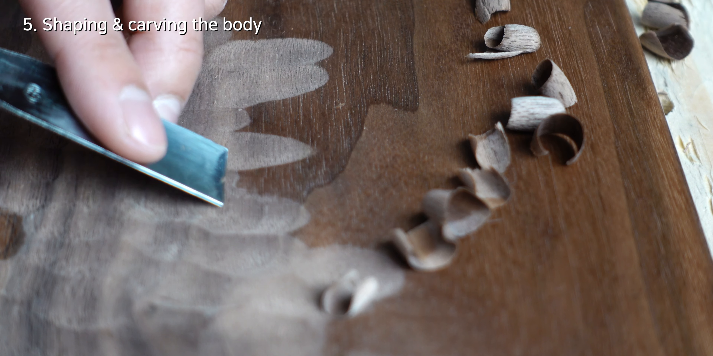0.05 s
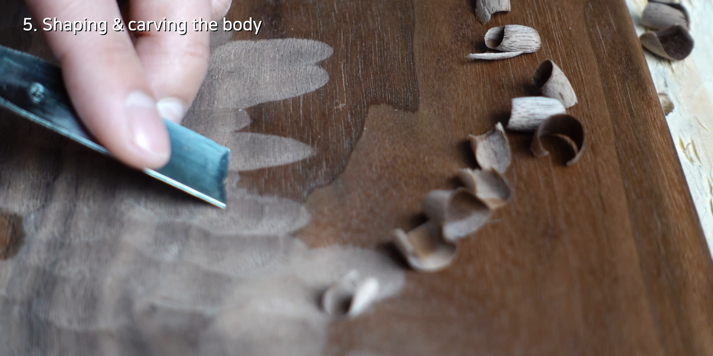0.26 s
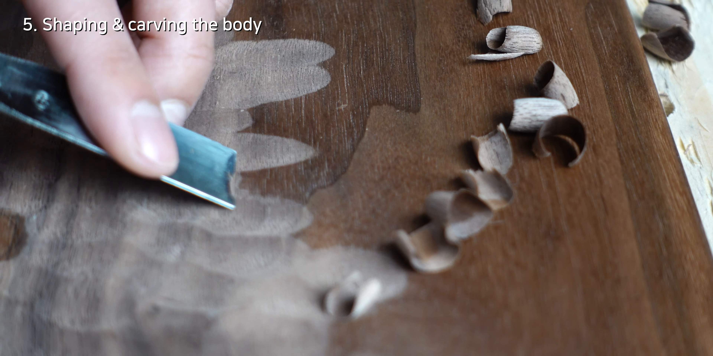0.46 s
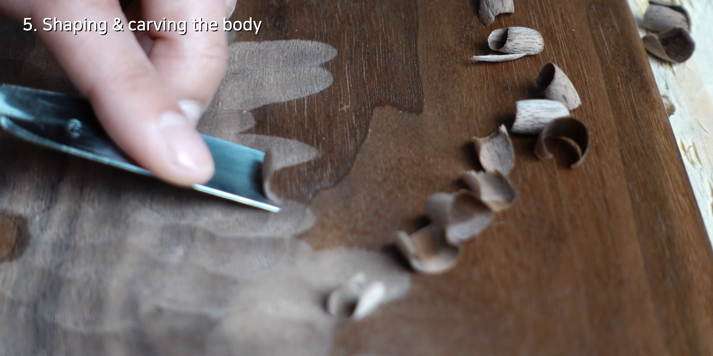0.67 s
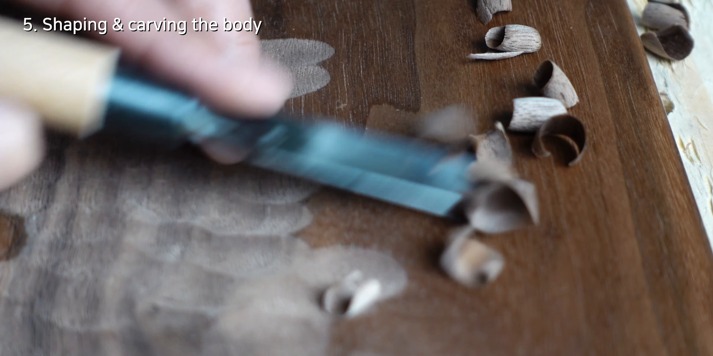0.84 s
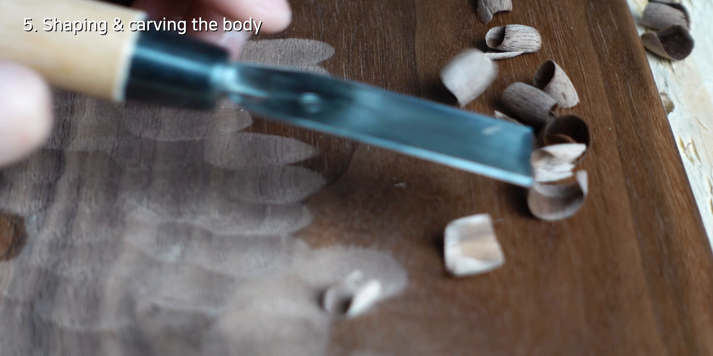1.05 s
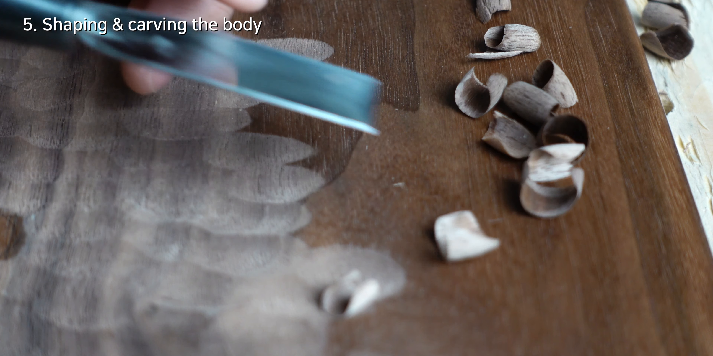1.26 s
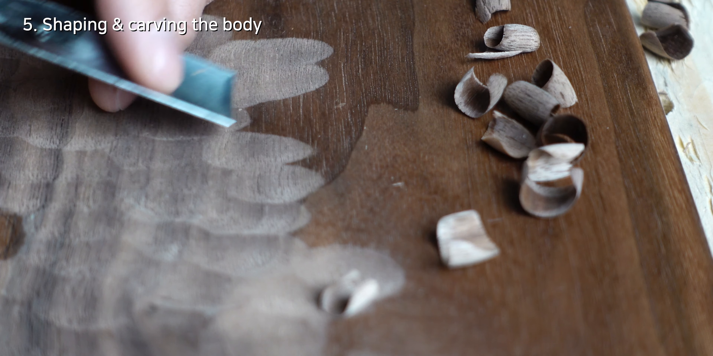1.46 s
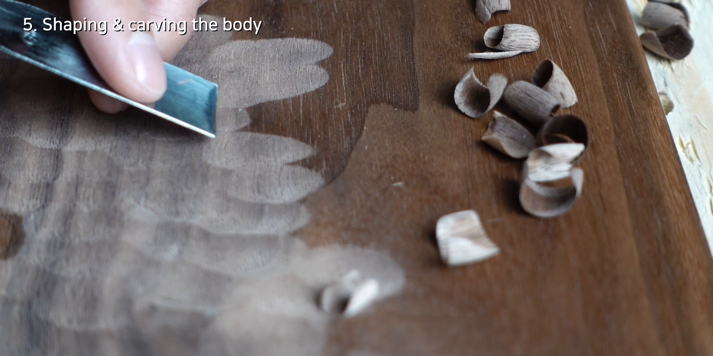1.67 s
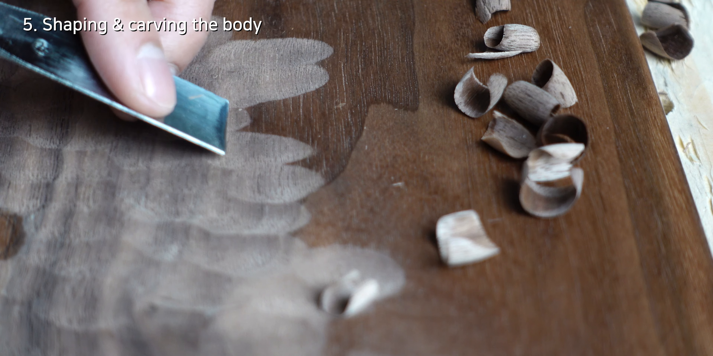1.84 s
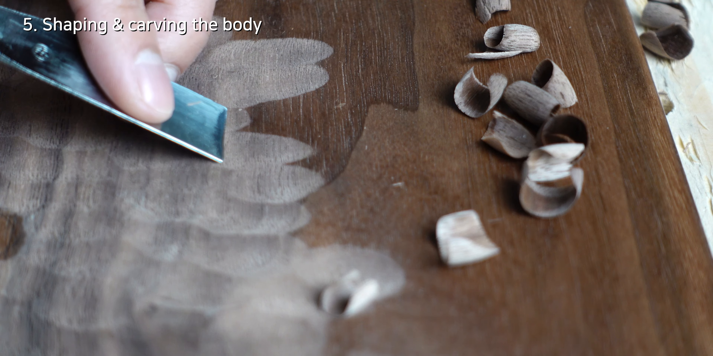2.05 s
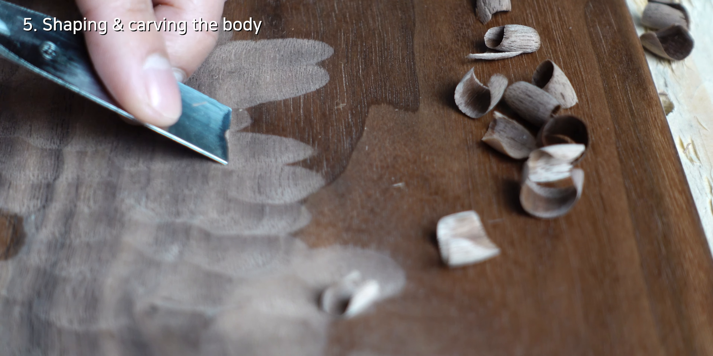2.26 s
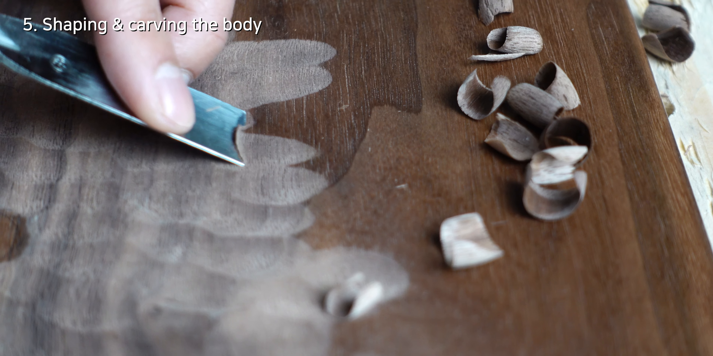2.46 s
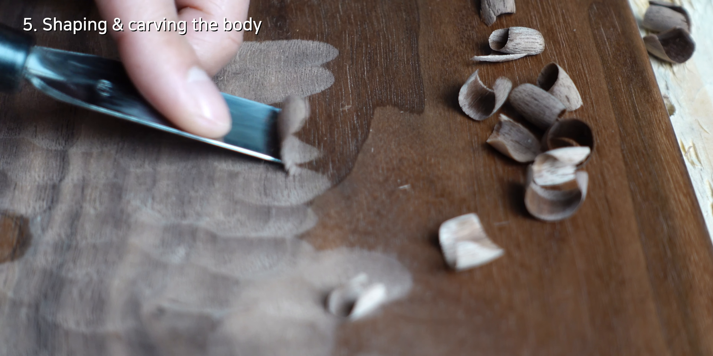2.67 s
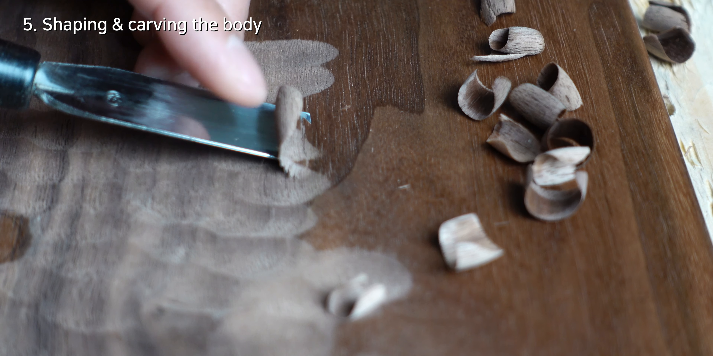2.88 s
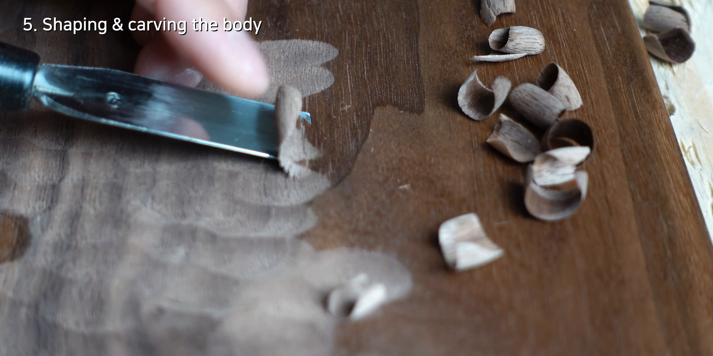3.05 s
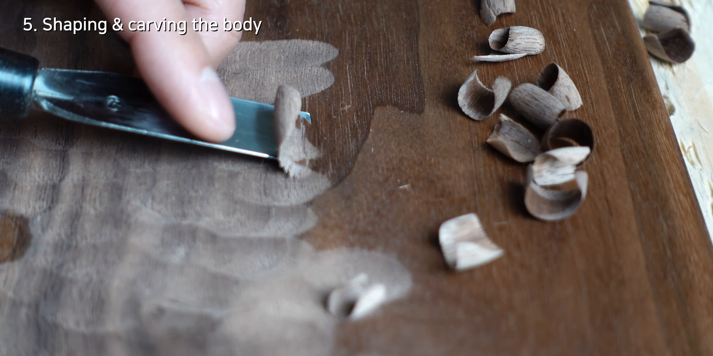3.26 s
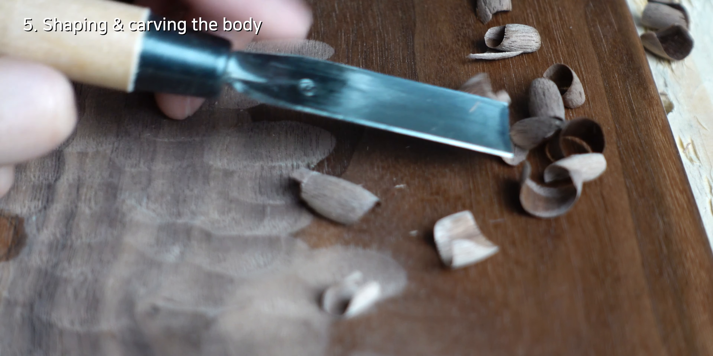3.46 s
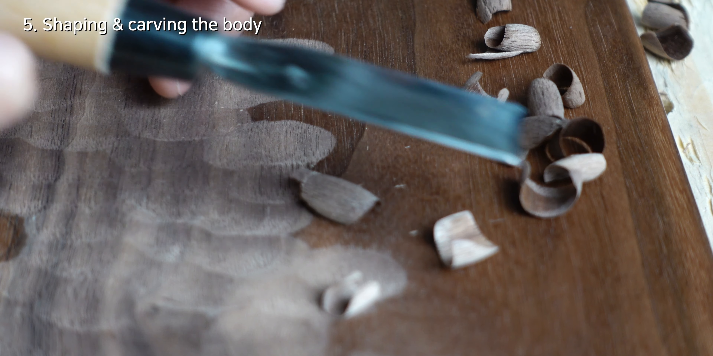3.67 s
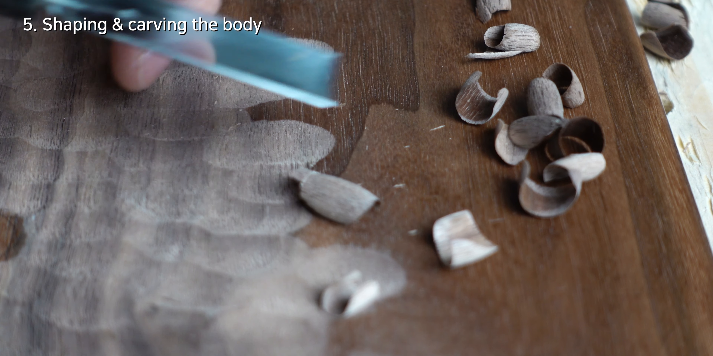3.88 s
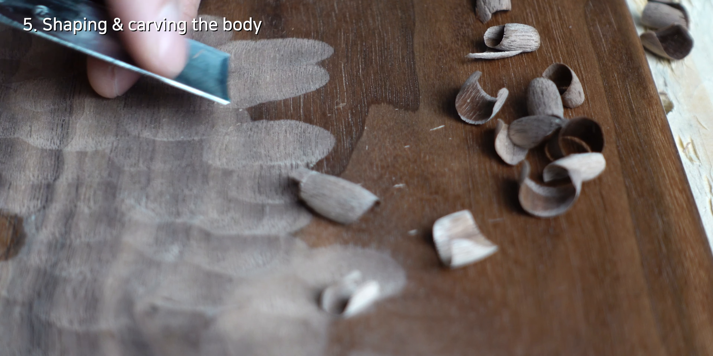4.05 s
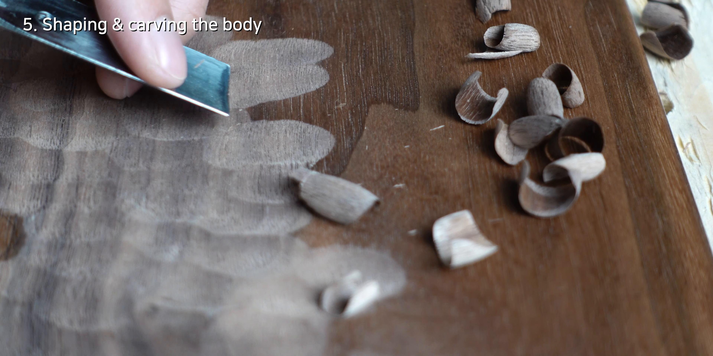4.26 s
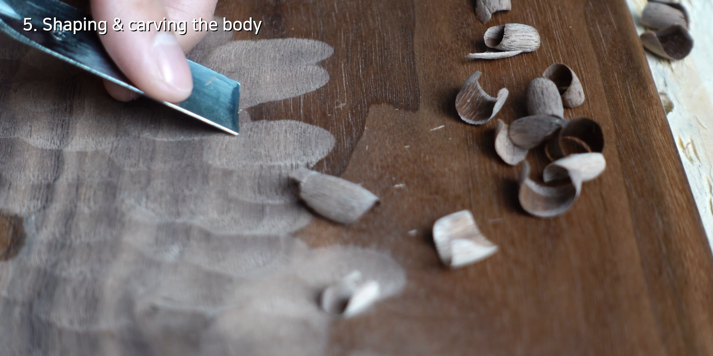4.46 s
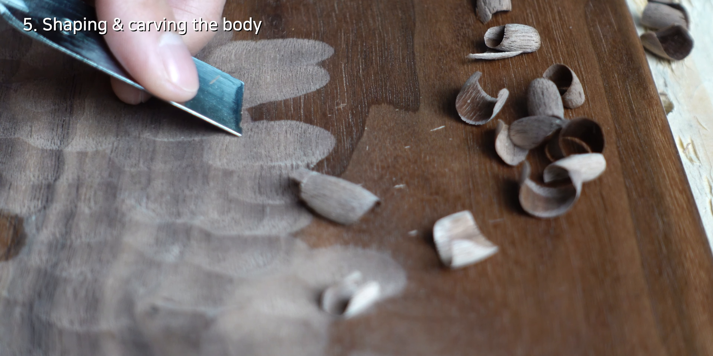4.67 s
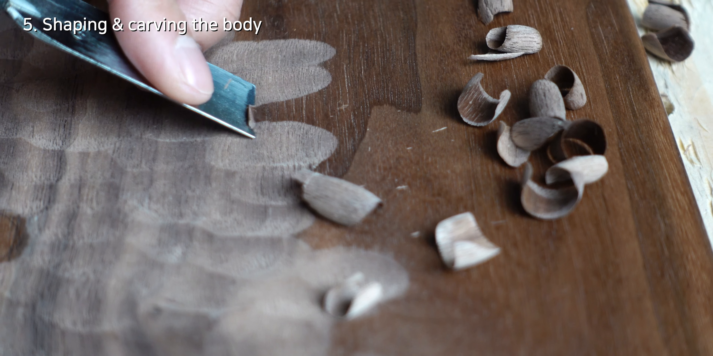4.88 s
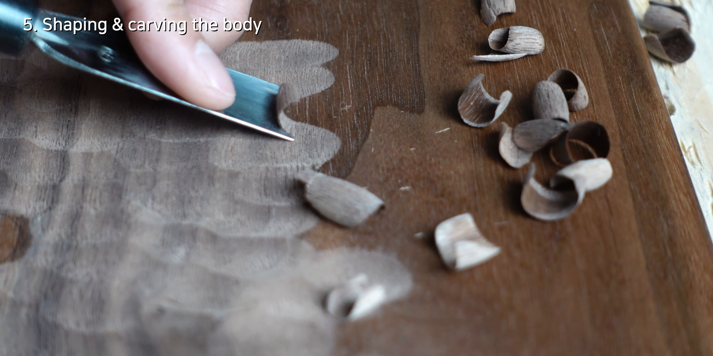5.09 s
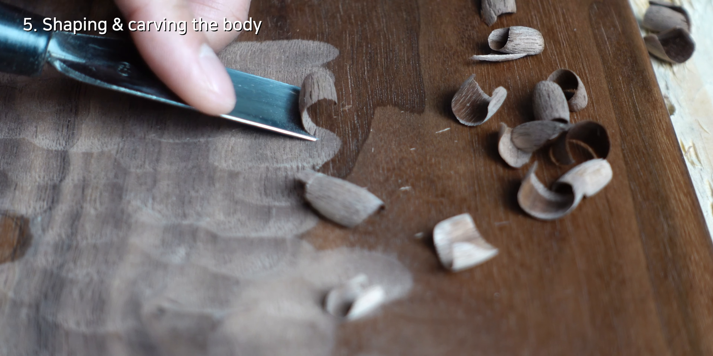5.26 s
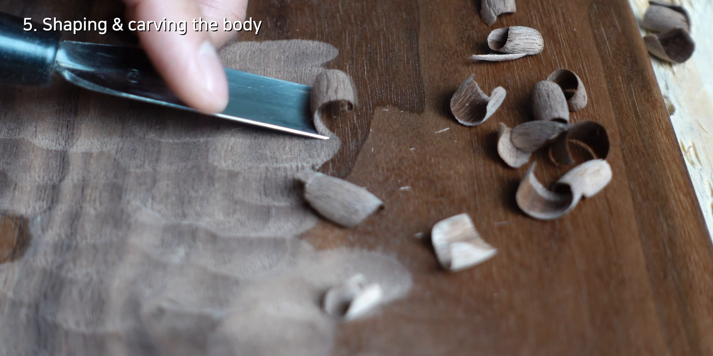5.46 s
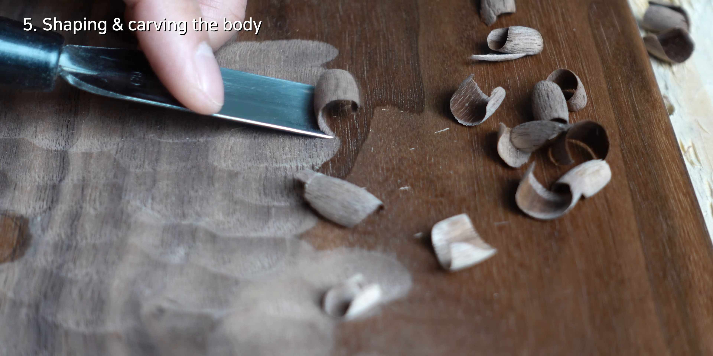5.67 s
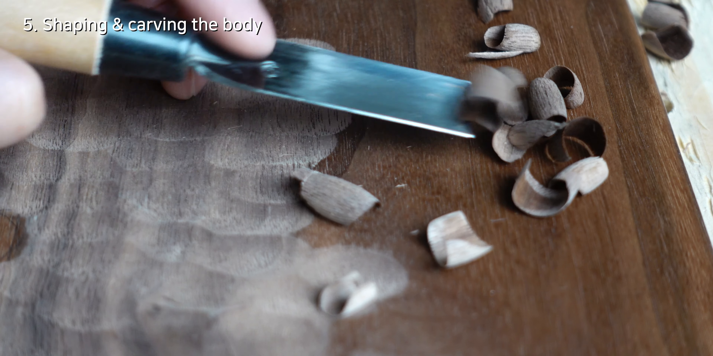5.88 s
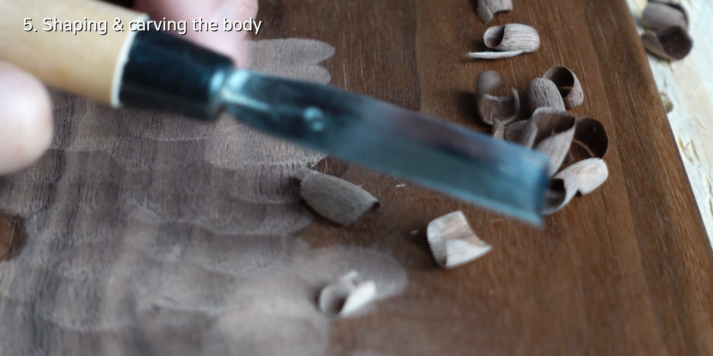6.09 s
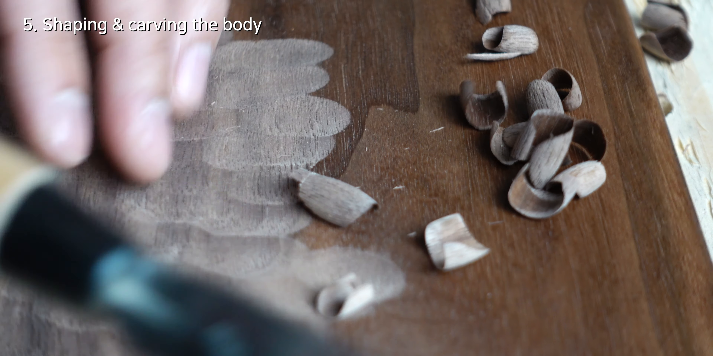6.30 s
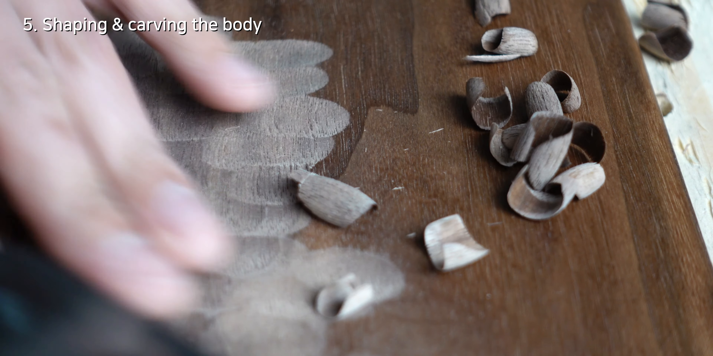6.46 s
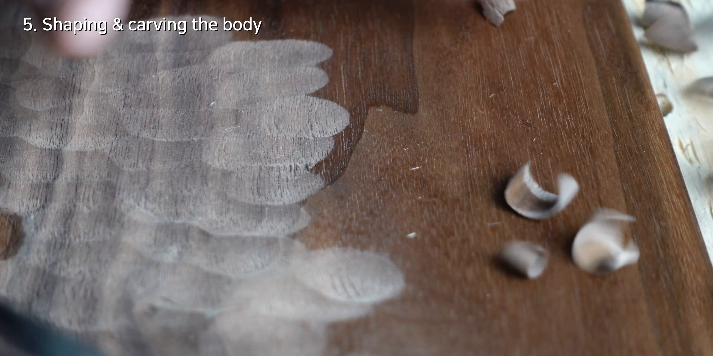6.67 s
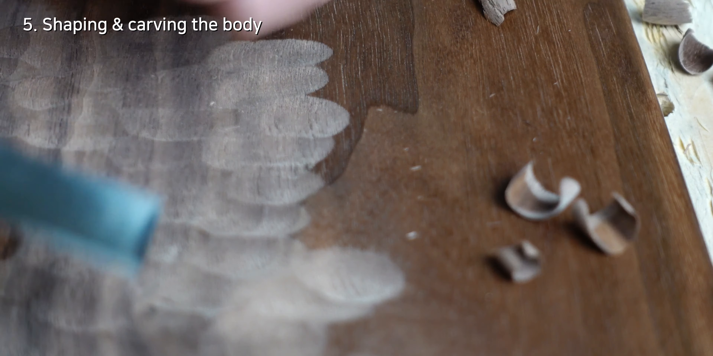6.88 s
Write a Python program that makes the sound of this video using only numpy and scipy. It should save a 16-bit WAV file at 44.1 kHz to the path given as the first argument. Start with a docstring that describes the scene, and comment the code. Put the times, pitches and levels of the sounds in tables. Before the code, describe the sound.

Heard very close in a quiet workshop, a hand gouge cuts a damp board in three strokes. Each builds from light ticks into dense, irregular crunching with small woody thuds, then the edge scrapes free with a brief mid-pitched squeak. Sleeves rustle softly between strokes, with faint knocks. At the end a hand brushes the board twice and curled shavings tick away.

```python
"""A hand gouge scoops shavings from a damp board, heard close by in a quiet workshop.
The edge moves by stick-slip: each slip tears fibres in a short crackle that excites modes of blade and board.
Fine shearing fills the pushes, and the freed edge scrapes out of the cut as gliding narrow-band noise and sings.
Knocks, scuffs and faint ticks, some dull and some bright, are bursts through the same modes. Shaped noise makes
the rustle of sleeves, a hand sweeping ticking shavings at the end, and the still air; decaying bands the room."""
import sys
import numpy as np
from scipy import signal
from scipy.fft import rfft, irfft, next_fast_len
from scipy.io import wavfile
from scipy.ndimage import uniform_filter1d

SR = 44100
rng = np.random.default_rng(int(sys.argv[2]) if len(sys.argv) > 2 else 0)


def dump(signal):
    """Clip the signal to [-1, 1] and save it as 16-bit WAV at the path in sys.argv[1]."""
    limited = np.clip(np.atleast_2d(signal).T, -1, 1)
    pcm = np.round(limited * 32767).astype(np.int16)
    wavfile.write(sys.argv[1], SR, pcm)


N = 305608
TIME = np.arange(N) / SR  # s


def undb(db):
    """Level: decibels to an amplitude ratio."""
    return 10 ** (np.asarray(db) / 20)


def unit(x):
    """Normalisation: scales a signal to an RMS of 1."""
    return x / np.sqrt(np.mean(x ** 2))


def filtered(x, hz, kind="low", order=2):
    """Linear filtering: a Butterworth low, high or band pass."""
    return signal.sosfilt(signal.butter(order, hz, kind, fs=SR, output="sos"), x)


def walk(rate):
    """Slow modulation: random levels of unit RMS, 'rate' per second, joined by straight slopes."""
    k = int(SR / rate)
    held = np.repeat(rng.standard_normal(N // k + 1), k)
    return unit(uniform_filter1d(held, k))[:N]


def pair(alike):
    """Interaural correlation: left and right noise with the given likeness, -1 to 1."""
    mid, side = rng.standard_normal((2, N))
    alike = np.clip(alike, -1, 1)
    opposed = side * np.array([[1], [-1]])
    return (np.sqrt(1 + alike) * mid + np.sqrt(1 - alike) * opposed) / np.sqrt(2)


def spread(x, envelope, side_db):
    """Source width: a wide source reaches both ports alike but for an opposed share of unrelated noise."""
    return envelope * (x + undb(side_db) * rng.standard_normal(N) * np.array([[1], [-1]]))


def crackle(spread_db):
    """Impulsive noise: sample sizes scatter widely, as of fibres snapping."""
    return unit(rng.standard_normal(N) * undb(spread_db * rng.exponential(1, N)))


def colour(x, points):
    """Spectral shaping: gain interpolated over log frequency between the given points."""
    hz, db = np.transpose(points)
    size = next_fast_len(N)
    gain = undb(np.interp(np.log(np.fft.rfftfreq(size, 1 / SR) + 1), np.log(hz), db))
    return irfft(rfft(x, size) * gain, size)[..., :N]


def bursts(s, db, rise_ms, fall_ms):
    """Energy addition: powers swell as a bell curve, die away nearly exponentially and sum."""
    power = np.zeros(N)
    for at, gain, rise, fall in np.broadcast(s, undb(db), rise_ms, fall_ms):
        span = slice(max(int((at - .02) * SR), 0), int((at + .05) * SR))
        ms = (TIME[span] - at) * 1000
        early = np.minimum(ms, 0) / max(rise, .1)
        late = np.maximum(ms, 0) / max(fall, .1)
        power[span] += gain ** 2 * np.exp(-early ** 2 - late ** 1.003)
    return np.sqrt(power)


def ring(x, modes, step=-1, wander_db=3.0):
    """Modal superposition: resonances driven unevenly by the moving edge; step is the factor per mode."""
    probe = np.r_[1., np.zeros(8191)]
    out, power = 0, 0
    for k, (hz, width, db, pan_db) in enumerate(modes):
        b, a = signal.iirpeak(hz, hz / max(width, 5), fs=SR)
        drive = x * undb(wander_db * walk(40))
        pan = np.array([[.5], [-.5]]) * pan_db
        out = out + step ** k * undb(db + pan) * signal.lfilter(b, a, drive)
        power += np.sum((undb(db) * signal.lfilter(b, a, probe)) ** 2)
    return out / np.sqrt(power)


# spectrum of the still air: pitch_hz [Hz], level_db [dB per Hz, relative]
AIR_SPECTRUM = [(15, -29), (25, -2), (187, -8), (238, -9.5), (273, -11.5), (296, -9.5), (470, -12),
                (2270, -20.5), (2820, -24), (15200, -28), (16500, -58.5)]
AIR_DB = -65  # mean of the two sides


def shop():
    """Ambient noise: the still air of the workshop, almost unrelated left and right, stronger on the left."""
    balance_db = np.array([[1.2], [-1.2]])
    return unit(colour(pair(0.078), AIR_SPECTRUM)) * undb(AIR_DB + balance_db + 0.21 * walk(0.9))


# reverberation time of the room: pitch_hz [Hz], decay_s [s per 60 dB]
REVERBERATION = [(100, 0.9), (400, 0.65), (1700, 0.33), (5000, 0.22), (14000, 0.027)]
ROOM_DB = -17.5  # reverberant relative to direct


def room(dry):
    """Reverberation: noise bands decay at their own rates; both sides hear partly the same tail."""
    hz, t60 = np.transpose(REVERBERATION)
    t = TIME[:SR // 2]
    tail = 0
    for centre in 60 * 2. ** np.arange(8.):
        noise = filtered(pair(0.4)[:, :len(t)], [centre / 1.44, centre * 1.3], "band")
        tail = tail + noise * undb(-60 * t / np.interp(np.log(centre), np.log(hz), t60))
    tail = tail * np.clip(t / 0.0015, 0, 1)
    tail = tail / np.sqrt(np.sum(tail ** 2) / 2)
    return undb(ROOM_DB) * signal.fftconvolve(dry.mean(axis=0)[None], tail, axes=1)[:, :N]


# course of the soft rustle: time_s [s], level_db [dB]
RUSTLE_COURSE = [(0, -63), (.95, -63), (1.5, -65.5), (1.6, -71.5), (1.96, -85), (2.2, -62.5), (3.08, -62.5),
                 (3.2, -69), (3.5, -62), (3.8, -64.5), (3.95, -62), (4.13, -66.5), (4.2, -83.5),
                 (4.45, -72.5), (4.75, -63), (5.9, -65), (6.3, -58), (6.93, -62)]
# spectrum of the rustle: pitch_hz [Hz], level_db [dB per Hz, relative]
RUSTLE_SPECTRUM = [(88, -41.5), (150, -7), (361, -3), (821, -6.5), (1100, -5), (4950, -14), (9820, -19),
                   (16000, -23.5)]


def rustle():
    """Friction noise: soft broad-band noise rises and falls, as of sleeves moving."""
    level_db = np.interp(TIME, *np.transpose(RUSTLE_COURSE)) + 1.2 * walk(23)
    return unit(colour(pair(0.9), RUSTLE_SPECTRUM)) * undb(level_db)


# swells as skin brushes the board: loudest_s [s], level_db [dB], rise_s [s], fall_s [s], both to 1/e
SWEEP_SWELLS = [(6.26, -53.5, 0.056, 0.069), (6.63, -49.5, 0.054, 0.09), (6.93, -63, 0.13, .1)]
# spectrum of the brushing: pitch_hz [Hz], level_db [dB per Hz, relative]
SWEEP_SPECTRUM = [(300, -18), (1500, 0), (3000, 2), (6000, -4), (10000, 1.5), (13000, -2), (16000, -12)]


def sweep():
    """Friction noise: skin brushes the board in bright, grainy swells with exponential flanks."""
    swells = np.zeros(N)
    for at, db, rise, fall in SWEEP_SWELLS:
        swells += undb(db) * np.exp(-np.where(TIME < at, (at - TIME) / rise, (TIME - at) / fall))
    return unit(colour(pair(0.86) * crackle(3.07), SWEEP_SPECTRUM)) * swells * undb(2.0 * walk(70))


# shavings tick under the sweeping hand: time_s [s], level_db [dB], pitch_hz [Hz, band centre]
SHAVING_TICKS = [(6.586, -45, 9550), (6.6253, -39, 6000), (6.631, -40, 3000), (6.6407, -42, 9000),
                 (6.651, -47, 9000), (6.6646, -45, 2800), (6.7105, -42, 1990), (6.717, -53, 2800),
                 (6.739, -46.5, 2580), (6.8045, -44.5, 7050), (6.8273, -45, 1980), (6.913, -55, 8000)]
TICK_OCTAVES = 1.3  # bandwidth


def ticks():
    """Impact noise: each shaving ticks as a short burst of band-limited noise."""
    out, wood = np.zeros((2, N)), pair(1.0)
    for s, db, hz in SHAVING_TICKS:
        span = slice(int((s - .01) * SR), int((s + .015) * SR))
        edges_hz = hz * 2 ** (np.array([-.5, .5]) * TICK_OCTAVES)
        tick = unit(filtered(wood[:, span], edges_hz, "band"))
        out[:, span] += bursts(s, db, 0.77, 1.17)[span] * tick
    return out


# the edge scrapes out: start_s [s], length_s [s], scrape_db [dB], first_hz [Hz], last_hz [Hz], ringing_db [dB]
EDGE_EXITS = [(.818, .074, -33, 1960, 1240, -51), (3.38, .04, -27.5, 1725, 1623, -46),
              (5.838, .04, -39, 1750, 1300, -55)]
SCRAPE_EDGE_S, SING_T60_S, SING_HZ = .008, .7, 1725
SCRAPE_HALF_WIDTH_HZ, SING_HALF_WIDTH_HZ = 130, 65
RASP_DB = -12  # a broad rasp, relative to the scrape


def exits():
    """Frequency glide and free decay: the edge chatters in a narrow sliding band, then the blade rings out."""
    hz, scrape, ringing = np.full(N, float(SING_HZ)), np.zeros(N), np.zeros(N)
    for start, length, db, first_hz, last_hz, ringing_db in EDGE_EXITS:
        t = TIME - start
        scraping = (t > 0) & (t < length)
        hz[scraping] = first_hz + (last_hz - first_hz) * t[scraping] / length
        scrape += undb(db) * np.clip(np.minimum(t, length - t) / SCRAPE_EDGE_S, 0, 1)
        ringing += (t >= length) * undb(ringing_db - 60 * np.maximum(t - length, 0) / SING_T60_S)
    turn = np.exp(2j * np.pi * np.cumsum(hz) / SR)
    sing = 0
    for level, half_width_hz in ((scrape, SCRAPE_HALF_WIDTH_HZ), (ringing, SING_HALF_WIDTH_HZ)):
        # slow noise on a carrier makes a narrow band around its frequency
        slow = filtered(rng.standard_normal((2, N)), half_width_hz)
        sing = sing + level * unit(slow[0] * turn.real + slow[1] * turn.imag)
    rasp = unit(filtered(crackle(2.5), [1000, 5000], "band"))
    return (sing + undb(RASP_DB) * scrape * rasp) * undb(np.array([[-1.5], [.6]]))


# the edge sinks into the wood: enters_s [s], full_depth_s [s], lifts_s [s]
CUT_DEPTHS = [(.4, 0.594, 1.2), (2.3, 2.572, 3.8), (4.85, 5.073, 6.1)]
# a shallow cut stirs the low modes and the treble less
SHALLOW_BASS_DB, SHALLOW_TREBLE_DB, TREBLE_HZ = -8, -11, 6500


def shallow():
    """Depth of engagement: 1 while the edge skims the surface, 0 at full depth."""
    depth = 0
    for enters, full, lifts in CUT_DEPTHS:
        depth = depth + np.interp(TIME, [enters, full], [0, 1]) * (TIME < lifts)
    return 1 - depth


# pushes: start_s [s], hardest_s [s], end_s [s], shearing_db [dB, drive], blade_ring_db [dB, relative]
GOUGE_PUSHES = [(.5, .8, 1.07, -45, -0.5), (2.3, 2.7, 3.04, -49.5, 0.4), (3.25, 3.4, 3.57, -53, 2),
                (4.88, 5.22, 5.62, -49, -1.5), (5.69, 5.84, 5.94, -50, 2.3)]
EASE_DB = -20  # shearing at the start and end of a push, relative to its hardest
# small fibres snap over the shearing; decay time to 1/e
SNAPS_PER_S, SNAP_DB, SNAP_SPREAD_DB, SNAP_MS = 95, -2, 3.5, 3.6


def shearing():
    """Random impulse excitation: small fibres snap over shearing that swells and eases with each push."""
    level = np.zeros(N)
    for start, hardest, end, db, _ in GOUGE_PUSHES:
        swell_db = np.interp(TIME, [start, hardest, end], [EASE_DB, 0, EASE_DB])
        level += (TIME > start) * (TIME < end) * undb(db + swell_db)
    sizes = undb(SNAP_DB + SNAP_SPREAD_DB * rng.uniform(-1, 1, N))
    hits = (rng.random(N) < SNAPS_PER_S / SR) * sizes
    snaps = signal.lfilter([1], [1, -np.exp(-1e3 / (SNAP_MS * SR))], hits)
    steady = level * undb(2 * walk(150))
    blade_ring_db = np.interp(TIME, *np.transpose(GOUGE_PUSHES)[[1, 4]])
    return steady, steady + level * snaps, blade_ring_db


# slips of the edge: time_s [s], crackle_db [dB, drive], length_ms [ms], thud_db [dB, board minus crackle]
EDGE_SLIPS = [(0.371, -37.5, 4.0, -5), (0.424, -30, 7, 5), (0.4774, -28.5, 2.4, -9.5),
              (0.5309, -27.5, 3.1, -1), (0.5776, -19, 7.5, -0.3), (0.589, -23.5, 2.4, -3.5),
              (0.6212, -26, 5.6, 5.5), (0.634, -34, 4.8, -3), (0.6404, -16.0, 2.6, -1),
              (0.679, -31, 4.2, 0.5), (0.6898, -19.5, 4.9, 0.4), (0.7009, -22.5, 4.1, 4),
              (0.7187, -22.5, 4.7, -6), (0.7361, -28.5, 3.5, 3.5), (0.7435, -22, 2.24, -2.8),
              (0.7614, -24, 1.6, -10.5), (0.7916, -21, 4.9, -1.5), (0.801, -24.0, 3.5, 1),
              (0.81, -19, 12.2, -1), (0.8211, -25, 5.7, -17), (2.2684, -43.5, 7, 0.6),
              (2.2736, -42.5, 2, 1.6), (2.331, -46, 8.4, -7), (2.351, -37.5, 3.9, -17),
              (2.3664, -31, 3, -3.2), (2.405, -34.5, 2.6, -5.5), (2.4107, -28, 3.5, 1),
              (2.467, -26, 7.2, -4), (2.4752, -26.5, 3.3, -10.5), (2.4847, -32, 3.1, -10),
              (2.5213, -40.5, 12, -1.5), (2.5552, -20.5, 4.7, -3), (2.5811, -22.5, 7.2, -0.5),
              (2.5997, -27, 5.3, 2), (2.6073, -23, 4.1, -7), (2.6162, -21.5, 3.4, 5.5),
              (2.6689, -18.5, 4.2, -0.9), (2.6814, -25, 14, -4), (2.6999, -27.5, 3.9, 11),
              (2.7124, -22.5, 5.4, -6.5), (2.73, -27, 3.3, 1.5), (2.7883, -34, 3.9, -2),
              (2.798, -25.5, 3.7, -6.5), (2.8198, -40.0, 2.0, 2), (2.858, -39.5, 3.3, -8.5),
              (2.88, -30, 5.5, -11), (2.89, -24.5, 2.2, -4.5), (3.249, -46, 1.5, -23.5),
              (3.2747, -41.5, 1.3, -21.5), (3.2876, -23.5, 1.7, -27.5), (3.311, -45, 6.6, -15.0),
              (3.3314, -29, 9.5, -3.5), (3.347, -40, 2.9, 3), (3.3596, -26.5, 3.5, -6),
              (3.375, -25.5, 15, -4.5), (3.3914, -22, 3, -14.5), (3.4056, -28.5, 4.4, -13),
              (3.4215, -38.5, 3, 5), (4.7806, -36.5, 3.6, -12.5), (4.7874, -47, 4.9, 1),
              (4.8704, -37.5, 4.9, -11), (4.9001, -35.5, 5, 1), (4.918, -21.5, 3.56, 1.5),
              (4.954, -20.5, 3.9, -4), (4.977, -37, 2.7, 3), (5.0013, -18.5, 3.8, -3),
              (5.0107, -28.5, 6.6, 0), (5.0212, -23.5, 4, -1.5), (5.0427, -32, 2.0, -13),
              (5.0599, -25.5, 3.1, -0.7), (5.0642, -15, 4.2, -2), (5.109, -10.5, 3.2, -8.5),
              (5.135, -23.5, 4.6, 3), (5.1394, -22, 5.1, 0), (5.1609, -20.5, 5.5, 2.5),
              (5.1706, -18, 3.4, -5.5), (5.1935, -21, 6.5, 1), (5.214, -19, 4, -1),
              (5.2826, -28.5, 2.2, -22), (5.2977, -27.5, 2.1, -23), (5.3236, -16.4, 3.4, -6.5),
              (5.374, -39, 2.4, -9), (5.404, -38, 6.1, -12), (5.4219, -23.5, 3.6, 0),
              (5.5168, -27.5, 1.8, -14.5), (5.5245, -26.0, 2.9, -2.2), (5.5808, -45, 2.3, -5),
              (5.712, -44, 7.8, -14), (5.7254, -36.5, 4.9, -6), (5.735, -30, 4.4, 1.5),
              (5.7579, -27.5, 2.85, -1.8), (5.8077, -30, 4.2, 2), (5.8252, -25, 9.2, -3)]
# knocks, scuffs and faint ticks of tool or hand on the board, some dull and some bright:
# time_s [s], peak_db [dB, drive], treble_db [dB, minus peak]
BOARD_CONTACTS = [(0.213, -52.5, 11), (2.045, -57, -19.5), (1.798, -57, 2.5), (1.88, -58.5, -3.5),
                  (2.186, -49, 0), (2.213, -47.5, 1), (3.558, -40, -21), (4.478, -40, -13),
                  (4.712, -40, 3.5), (5.572, -41, -20), (5.975, -47.5, 0), (6.309, -39.5, -5),
                  (6.368, -37.5, -5)]
RISE_SHARE, FALL_SHARE = 0.38, .37  # of a slip's length


def impacts(thud_share, slip_gain_db, treble_share, contact_gain_db, contact_rise_ms, contact_fall_ms):
    """Transient excitation: slips and board contacts as bursts, with a chosen share of thud and of treble."""
    slip_s, slip_db, length, thud_db = np.transpose(EDGE_SLIPS)
    contact_s, contact_db, treble_db = np.transpose(BOARD_CONTACTS)
    slip_level_db = slip_db + thud_share * thud_db + slip_gain_db
    slips = bursts(slip_s, slip_level_db, RISE_SHARE * length, FALL_SHARE * length)
    contact_level_db = contact_db + treble_share * treble_db + contact_gain_db
    return slips + bursts(contact_s, contact_level_db, contact_rise_ms, contact_fall_ms)


# low modes of the board: pitch_hz [Hz], width_hz [Hz], level_db [dB, relative], pan_db [dB, left minus right]
BOARD_MODES = [(100, 6.7, -12, 2.5), (118, 27, -10, 2.5), (154.4, 36, -8, 1), (210, 38, -5, 2.5),
               (241.5, 31, 2, -3), (296.6, 8.9, -0.5, 4.5), (346, 31, 2, 2), (400.5, 29, -5, -4),
               (458, 23, -3, 8), (510.7, 41, -12.5, -8), (613, 34, -3, 5)]


def board(tear, shove, skim):
    """Modal response to force: slips shake the board, and each change of force jolts it."""
    push = spread(tear, shove, -13) + 30 * np.gradient(shove)
    low = ring(push * undb(SHALLOW_BASS_DB * skim), BOARD_MODES[:5], step=0.86)
    high = ring(push, BOARD_MODES[5:], step=0.92)
    # the small board radiates little deep bass
    return filtered(undb(-3.0) * low + undb(-3) * high, 110, "high")


def rocking(shove, skim):
    """Antiphase motion: the bench rocks the microphone, so the deepest bass pulls the two ports apart."""
    sway = shove * undb(SHALLOW_BASS_DB * skim) * pair(-0.52)
    return undb(19) * filtered(sway, [32, 92], "band")


# middle modes: pitch_hz [Hz], width_hz [Hz], level_db [dB, relative], pan_db [dB, left minus right]
MIDDLE_MODES = [(940, 43, -12.5, -1), (1010, 160, 0.5, -2.5), (1148.5, 75, 2.5, -2), (1297, 160, -1.5, -1),
                (1567, 140, -1, -1), (1733, 46, -5.5, 0), (1712, 30, -4, -1), (1934, 280, -2, -1)]


def middle(tear, shear):
    """Modal coupling: the middle modes take part of the thud."""
    drive = impacts(0.49, -3.0, 0, -5, 0.54, 1.2) + undb(-15.0) * shear
    return ring(spread(tear, drive, -11.0), MIDDLE_MODES)


# modes of the blade: pitch_hz [Hz], width_hz [Hz], level_db [dB, relative], pan_db [dB, left minus right]
BLADE_MODES = [(2850, 150, 5, 1.5), (3500, 440, -1, -0.5), (4320, 450, -5, -3), (4800, 400, 0.5, 2),
               (5850, 140, -7, 2.5), (6740, 320, -5, 4.5), (8880, 360, -26.5, -1.5), (10550, 1700, -2, 3),
               (13250, 5600, -19.5, 10.5)]
SHEAR_RING_SHARE = .4  # the steady shearing rings the blade less than a slip does


def blade(tear, sharp, shear, blade_ring_db):
    """Modal resonance: the blade rings in its high modes, more in some pushes than in others."""
    drive = (sharp - (1 - SHEAR_RING_SHARE) * shear) * undb(-2 + blade_ring_db)
    return ring(spread(tear, drive, -19.5), BLADE_MODES, wander_db=3.5)


def fibres(tear, sharp):
    """Direct radiation: fresh fibres crackle into the air, hard slips more than in proportion."""
    fresh = sharp * (sharp / undb(-15)) ** 0.083
    return undb(-2) * filtered(spread(tear, fresh, -8.5), [1800, 14000], "band", order=1)


def cut():
    """Stick-slip excitation: slips, board contacts and fine shearing drive fibres, blade and board together."""
    shear, snapping, blade_ring_db = shearing()
    tear, skim = crackle(2.63), shallow()
    sharp = impacts(0, 0, 1, -6.5, 0.46, 2.5) + snapping
    shove = impacts(1, -1.5, 0, -15, 0.5, 0.27) + undb(3.5) * shear
    bright = blade(tear, sharp, shear, blade_ring_db) + fibres(tear, sharp)
    treble = filtered(bright, TREBLE_HZ, "high", order=1)
    bright = bright + (undb(SHALLOW_TREBLE_DB * skim) - 1) * treble
    return bright + board(tear, shove, skim) + rocking(shove, skim) + middle(tear, shear)


def scene():
    """Superposition: the work and its reverberation over the hands and the still air."""
    work = cut() + exits()
    return shop() + room(work) + rustle() + sweep() + ticks() + work


def record(dry):
    """Band limiting: the microphone fades above its port resonance and the recorder cuts the top."""
    dry = filtered(dry, 12500, order=1)
    return signal.sosfilt(signal.ellip(10, .2, 60, 15900, fs=SR, output="sos"), dry)


dry = scene()
out = record(dry)
dump(out)
```